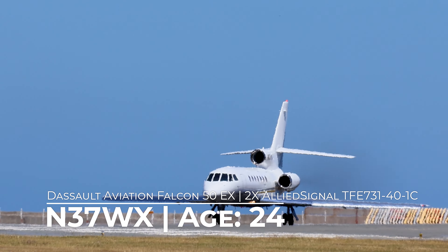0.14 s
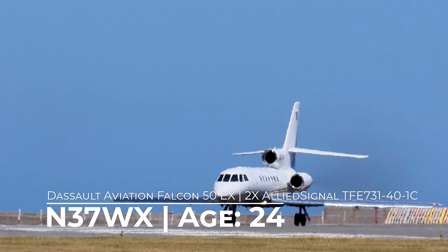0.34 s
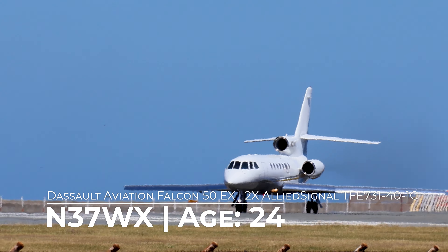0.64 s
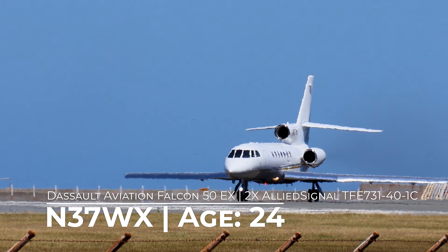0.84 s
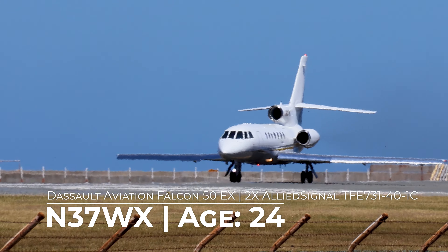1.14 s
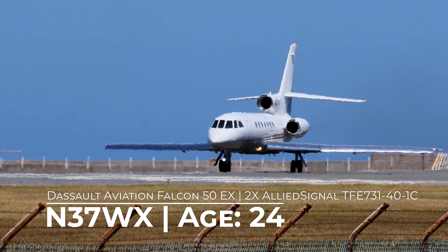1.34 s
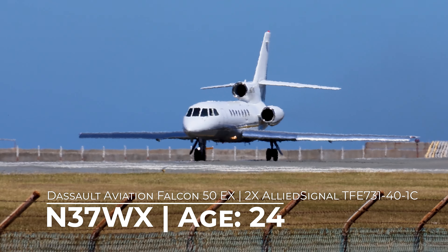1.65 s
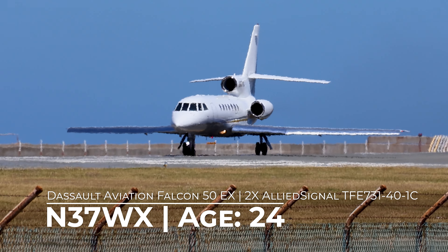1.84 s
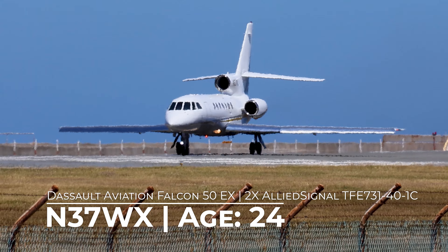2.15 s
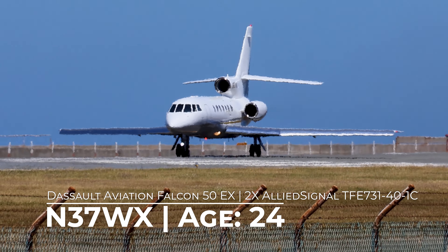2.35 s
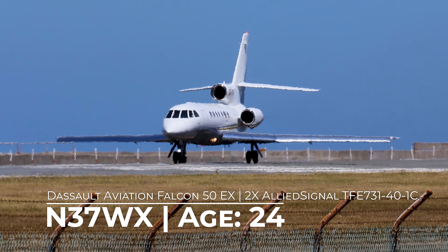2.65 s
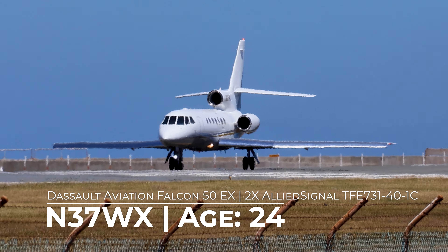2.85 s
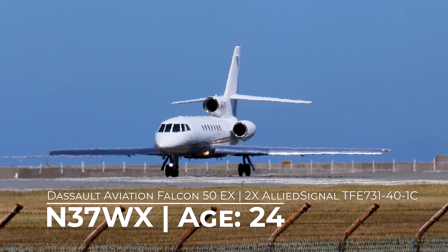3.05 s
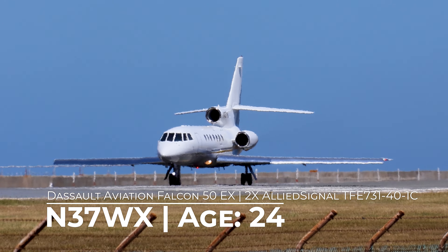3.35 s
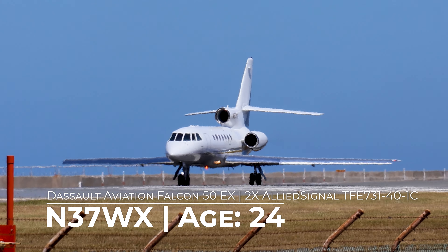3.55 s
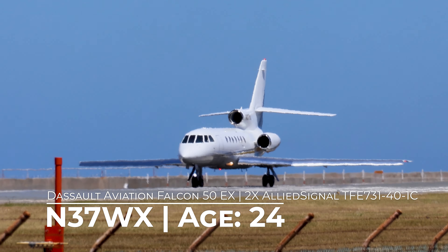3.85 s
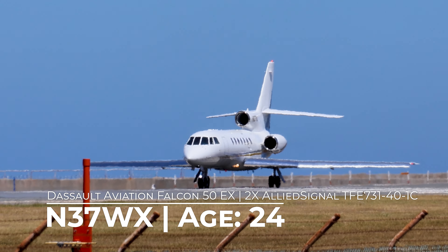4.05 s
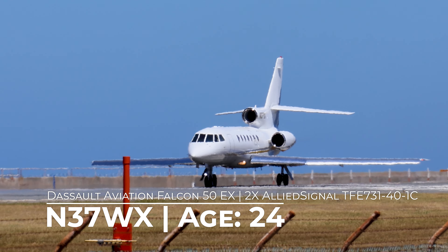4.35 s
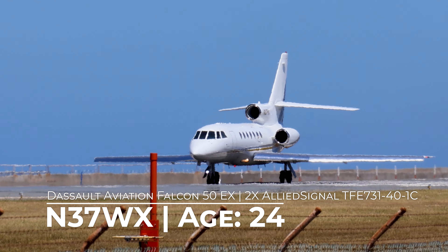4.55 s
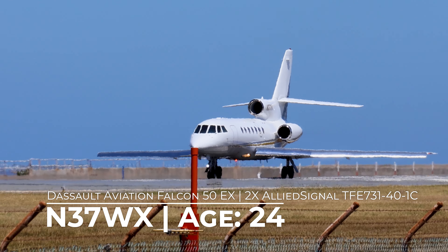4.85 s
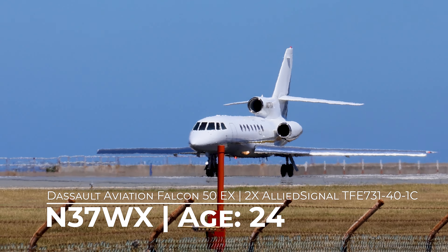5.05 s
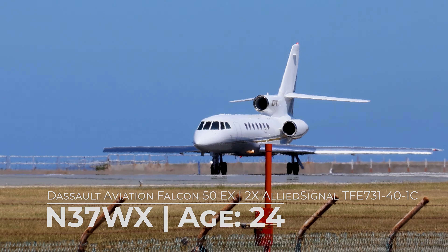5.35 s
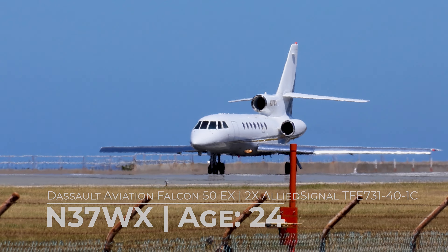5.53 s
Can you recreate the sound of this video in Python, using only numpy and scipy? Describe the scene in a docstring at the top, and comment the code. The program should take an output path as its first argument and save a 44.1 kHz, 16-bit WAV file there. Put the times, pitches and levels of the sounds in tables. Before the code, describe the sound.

A far-off jet starts its takeoff roll: faint hiss and whine swell into a broad roar, with a rough singing core tone appearing after two seconds. The fan pitch stops climbing near three seconds. Low wind buffets and dull knocks strike the open-air stereo microphone in clusters, densest after four seconds, with the engine ducking after strong hits.

```python
"""Business jet starting its takeoff roll

A three-engined jet spools up a few hundred metres away, slightly to the right of a two-port microphone.
Coloured noise makes the exhaust roar; gliding tones make the fan and core whines; all waver in moving air.
Close by, runs of damped thumps buffet the ports as gusts, with lone knocks, a faint rustle and ticks.
The recorder's limiter turns everything down after the strong gusts, and a low-pass cuts the top treble.
"""
import sys
import numpy as np
from scipy import signal
from scipy.fft import rfft, irfft, next_fast_len
from scipy.io import wavfile
from scipy.ndimage import uniform_filter1d

SR = 44100
rng = np.random.default_rng(int(sys.argv[2]) if len(sys.argv) > 2 else 0)


def wav_out(sig):
    """Save sig, one row per channel (or a flat mono array), as 16-bit PCM at SR to the path in sys.argv[1]."""
    wavfile.write(sys.argv[1], SR, np.round(np.clip(np.atleast_2d(sig).T, -1, 1) * 32767).astype(np.int16))


N = 250929
T = np.arange(N) / SR
PORT_SIGNS = np.array([[1], [-1]])  # left, right

# reference level of the distant jet, rising with thrust and drifting with the air: t/s, level/dB
JET_LEVEL = [(0, -49), (0.15, -43.5), (0.3, -43), (0.55, -37), (1.15, -34.5), (1.6, -33.5), (2.3, -31),
             (2.7, -29), (3.4, -29), (3.9, -31.5), (4.35, -31), (4.7, -36.5), (5.05, -36), (5.35, -33.5),
             (5.68, -31.5)]
# blade-passing pitch of the fan; the late creep is the jet gathering pace: t/s, f/Hz
FAN_PITCH = [(0, 2898), (0.35, 3085), (0.75, 3358), (1.25, 3752), (1.55, 4043), (2.2, 4734), (2.72, 5312),
             (3.4, 5445), (4.2, 5470), (5.69, 5570)]
# octave whines of the other two engines: pitch ratio, level/dB, fade/(dB/s), start/s
SISTER_WHINES = [(.927, -7.5, 5, -.1), (1.075, -13, 3, .15)]
# roar against the jet's level: t/s, level/dB
ROAR_SWELL = [(0, -0.5), (0.5, -1), (0.66, -1.5), (0.73, 0), (1.3, -0.5), (1.5, -1), (2.2, 0), (2.35, -1),
              (2.62, -3), (2.92, 2.5), (3.2, -1.5), (3.45, -0.5), (4.0, -0.5), (4.5, -1), (5.25, 0.5),
              (5.69, -1)]
# treble hiss against the jet's level: t/s, level/dB
HISS_SWELL = [(0, 0.5), (1.05, 0), (1.14, -5), (1.25, -1), (1.62, 0.5), (1.85, 1), (2.1, -0.5), (2.4, 1),
              (2.6, 1), (3.0, -0.5), (3.3, 0), (4.3, 0.5), (5.1, 0), (5.65, 1)]
# high-pressure spool, pitch of its fourth shaft order: t/s, f/Hz, level/dB
CORE_TONE = [(1.7, 2110, -52), (2.15, 2154, -41), (2.27, 2176, -29), (2.39, 2183, -29), (2.46, 2200, -38),
             (2.6, 2217, -34.5), (2.95, 2230, -33), (3.5, 2237, -38), (4.3, 2255, -45), (5.38, 2280, -45),
             (5.5, 2292, -34.5), (5.69, 2300, -36.5)]
# lines of the three spools and their gearing, the close pair beating: multiple of shaft speed, level/dB
CORE_LINES = [(3.25, -11), (3.994, -0.3), (4.013, -2.5), (4.26, -10), (5.06, -13), (12, -52)]
# how well the fan tones carry through the shifting air: t/s, blade tone level/dB, octave level/dB
TONE_CARRY = [(0, -7, -4), (0.2, -2, -1), (0.32, 0.5, -8), (0.42, -9, -12), (0.58, 1, -8), (0.68, -1.5, -5),
              (0.8, 1.5, -1), (0.92, -4, -4), (1.07, -1, -3), (1.16, -5, -3), (1.3, 1.5, 1), (1.43, -6, 0),
              (1.58, 1.5, 1), (1.75, -2, -8), (2.15, 3, -12), (2.4, 3.5, -16), (2.62, 4, -20),
              (2.8, -0.5, -20), (3.05, -5, -20), (3.45, 2.5, -20), (3.7, -3, -20)]

# noise colours, each scaled to rms 1 before its level is set: f/Hz, relative density/dB
# low end of the exhaust
RUMBLE_COLOUR = [(20, -44), (40, -33), (65, -12.5), (100, -6.5), (135, -0.5), (280, -2.5), (430, 3),
                 (600, 1), (800, -11.5), (1300, -35)]
# exhaust roar
ROAR_COLOUR = [(300, -28.5), (550, -17.5), (750, -5.5), (950, 0.5), (1150, 3), (1280, 2), (1400, -3),
               (1600, -3.5), (2100, -36.5)]
# core rush at low power
RUSH_SLOW_COLOUR = [(850, -41), (1450, -5.5), (1640, -2), (1890, 4), (2120, 1), (2330, -7.5), (2640, -5.5),
                    (2910, -21.5), (3100, -28), (4030, -44.5), (6820, -120)]
# core rush at takeoff power
RUSH_FAST_COLOUR = [(1200, -25), (1500, -10.5), (1750, -1.5), (1950, -0.5), (2120, 1.5), (2300, -3),
                    (2480, -8), (2720, -4.5), (2870, -9.5), (3080, -21.5), (3600, -37)]
# fan hiss at low power
HISS_SLOW_COLOUR = [(1760, -40), (3000, -8.5), (3140, -10), (3290, -3.5), (3930, -5), (4200, -4),
                    (5460, -19.5), (5930, -26.5), (7710, -40.5), (13000, -120)]
# fan hiss at takeoff power
HISS_FAST_COLOUR = [(2600, -18), (3050, 1.5), (3550, 2.5), (3950, -1), (4450, 4.5), (4750, 5.5),
                    (5150, -1.5), (5600, -9.5), (5900, -14.5), (6600, -24), (7700, -33), (11000, -61.5)]
# flutter of moving air at the ports
FLUTTER_COLOUR = [(20, -37.5), (50, -31.0), (90, -11.0), (140, -3.5), (260, -0.5), (450, -5.5),
                  (700, -14.5), (1400, -26.5), (3000, -58.5)]
# rustle of the breeze
RUSTLE_COLOUR = [(5500, -8.5), (7500, 3.5), (10000, -1.5), (14000, -3.5), (16000, -6.0)]
# dull crack at the front of a knock
CRACK_COLOUR = [(450, -4.0), (800, -2.0), (1400, -8), (3000, -25.5)]

# faint high rustle of the breeze: t/s, level/dB
RUSTLE_LEVEL = [(0, -80.5), (0.8, -70.5), (1.08, -70), (1.27, -65), (1.55, -71.5), (1.8, -68.5),
                (2.5, -73.5), (3.5, -70), (4.7, -76.5), (5.25, -75.5), (5.43, -70), (5.6, -72.5)]
# breeze at the ports between the gusts: t/s, level/dB
BREEZE_LEVEL = [(0, -56.5), (0.38, -55), (0.55, -46.5), (1.2, -40.5), (1.68, -46), (1.92, -39), (2.8, -50),
                (3.05, -36), (3.65, -37), (4, -46.5), (5.08, -50.5), (5.6, -36.5)]
# gusts on the microphone: centre t/s, length/s, level/dB, left minus right/dB, thump f/Hz
GUSTS = [(0.132, 0.019, -36.5, 3, 300), (0.204, 0.028, -31, 5, 316), (0.495, 0.011, -34.5, 8, 233),
         (0.787, 0.027, -24, 0.5, 240), (0.873, 0.016, -22.5, 4, 283), (0.905, 0.022, -26.5, 7, 307),
         (0.962, 0.027, -18.5, 2.5, 348), (0.995, 0.0093, -14.5, 5.5, 460), (1.495, 0.013, -31.5, 12, 300),
         (1.719, 0.013, -17, 3.5, 350), (1.739, 0.012, -10, 1, 350), (1.775, 0.033, -20, 8.5, 320),
         (2.041, 0.028, -20.5, 7, 337), (2.132, 0.02, -19, 6, 314), (2.203, 0.017, -25.5, 1, 301.3),
         (2.263, 0.015, -21, 2, 322), (2.339, 0.023, -21.5, 3, 330), (2.38, 0.015, -23, 8, 397),
         (2.423, 0.011, -11.5, 4, 476), (2.448, 0.029, -12.5, 1.5, 470), (2.554, 0.022, -26.5, 6.5, 370),
         (2.669, 0.023, -25.5, 7, 300), (2.87, 0.017, -31.5, 3, 300), (2.917, 0.016, -29, 10, 323),
         (3.342, 0.00973, -28, 9, 280), (3.735, 0.016, -12, 0.5, 294), (3.772, 0.019, -9.5, 7, 300),
         (3.819, 0.016, -20, 3, 270), (4.15, 0.019, -18.5, 9, 302), (4.193, 0.021, -10.5, 0.5, 423),
         (4.243, 0.034, -19, 9, 345), (4.423, 0.024, -9, 1, 395), (4.504, 0.017, -15, 4.5, 450),
         (4.57, 0.023, -24.5, 12, 460), (4.624, 0.0088, -27, 20, 427), (4.731, 0.021, -23.5, 1, 334),
         (4.76, 0.009, -12, 7, 448), (4.878, 0.018, -19.5, -3, 305), (4.94, 0.0271, -27.5, 2.5, 305),
         (5.003, 0.0089, -24, 19, 490), (5.212, 0.027, -15.5, 7, 367), (5.252, 0.029, -15.5, 1.5, 473),
         (5.332, 0.021, -25, 7, 350), (5.419, 0.018, -18, 10.5, 343), (5.462, 0.013, -22, 9, 370)]
# lone hard eddies knocking on the ports: t/s, level/dB, left minus right/dB, f/Hz
KNOCKS = [(0.237, -20.5, 12.5, 420), (0.859, -10.5, -3, 300), (0.996, -2, 9.5, 590),
          (1.008, -14.5, 8.5, 326), (1.03, -5, 9.5, 401), (1.047, -14.5, 6, 340), (1.069, -16.5, 2, 400),
          (1.719, -7, 7, 455), (1.73, -4, 7, 360), (1.738, 7, 0, 350), (2.419, -11, 1, 680),
          (2.424, -0.5, -2, 470), (2.479, -6, 6, 330), (2.544, -15.5, 5, 480), (3.705, -10, -5, 287),
          (3.726, -5, -5, 520), (3.734, -5.5, -5.5, 127), (3.819, -10, 6, 299.4), (4.139, -12.5, 13, 341),
          (4.23, -6.5, 15, 370), (4.41, -4.5, 4, 596), (4.504, -13.5, 9, 652), (4.517, -6.5, 18.5, 715),
          (4.712, -13.5, 0, 378), (4.769, -13.5, 1, 455), (4.889, -6.5, -7, 348), (5.242, -9, 2, 650),
          (5.29, -9.5, 6, 399), (5.377, -12, 17, 430), (5.48, -13, -13, 585), (5.484, -16, -3, 169)]
# faint ticks close by: peak t/s, centre f/Hz, level/dB, rise and fall time/s
TICKS = [(0.315, 6500, -57, 0.002), (3.312, 6860, -37, 0.0007), (3.42, 11400, -53, 0.004)]

# parts of the jet's noise against its level: (dB at low power, dB at takeoff power)
RUMBLE_DB, ROAR_DB, RUSH_DB, HISS_DB = (-8.5, -8), (-1, -1), (-0.5, -0.74), (-5, -9)
# the core rush swells once near full power: time of peak, time from peak to 1/e of the dB rise, rise
SURGE_S, SURGE_LENGTH_S, SURGE_DB = 1.96, 0.6, 3
# blade tone and octave against the jet's level before the air absorbs them; absorption
FAN_DB, OCTAVE_DB, AIR_DB_PER_KHZ2 = -2.3, 5.5, 0.62
# eddies in a gust: number per s, scatter of strength in dB, scatter of log pitch
EDDY_RATE, EDDY_SPREAD_DB, EDDY_PITCH_SPREAD = 480, 2.2, .3
# restless air around a gust: rise of power in gust lengths, fall time of power, level against the gust
STIR_RISE, STIR_FALL_S, STIR_DB = 1, 0.023, -12.5
BREEZE_SPREAD_DB = 2.5  # reach of the random swells
# decay of a knock in nepers per cycle; its crack's level and fall time
KNOCK_DAMPING, CRACK_DB, CRACK_S = 2.44, -15, .002
TOP_HZ = 15700  # treble cut-off


def undb(db):
    """Decibels to gain."""
    return 10 ** (np.asarray(db) / 20)


def curves(table):
    """Each column after the time as a control signal."""
    s, *columns = np.transpose(table)
    return [np.interp(T, s, column) for column in columns]


def unit(x):
    """Scale to rms 1."""
    return x / np.sqrt(np.mean(x ** 2))


def noise(colour):
    """Random noise shaped in frequency, rms 1."""
    hz, db = np.transpose(colour)
    f = np.maximum(np.arange(N // 2 + 1) * SR / N, 1)
    gain = undb(np.interp(np.log(f), np.log(hz), db, left=-120, right=-120))
    return unit(irfft(rfft(rng.standard_normal(N)) * gain, N))


def walk(rate):
    """Random levels held for 1 / rate s and slewed twice, rms 1."""
    k = max(int(SR / rate), 2)
    held = np.repeat(rng.standard_normal(N // k + 2), k)
    held = held[rng.integers(k):][:N]
    return unit(uniform_filter1d(uniform_filter1d(held, k), k))


def wide(colour, side_db):
    """Stereo noise: a common part, and a difference scattered by the ground."""
    return noise(colour) + undb(side_db) * noise(colour) * PORT_SIGNS


def drifting(colour, side_db, drift, drift_rate):
    """Stereo noise whose resonances slide a few percent as the path through the air changes."""
    place = np.cumsum(1 + drift * walk(drift_rate)) % N
    return np.array([np.interp(place, np.arange(N), port) for port in wide(colour, side_db)])


def shimmer(x, depth_db, fade_rate):
    """Warm air over the runway makes bands a third of an octave apart swell and fade on their own."""
    size = next_fast_len(N)
    spectrum = rfft(x, size)
    f = np.maximum(np.arange(size // 2 + 1) * SR / size, 1)
    # overlapping bands from 800 Hz; the lowest and highest take in all beyond them
    place = np.clip(3 * np.log2(f / 800), 0, 9)
    out = 0
    for k in range(10):
        band = irfft(spectrum * np.maximum(1 - np.abs(place - k), 0), size)[:, :N]
        out = out + band * undb(depth_db * walk(fade_rate))
    return out


def jet_noise():
    """Exhaust, core and fan noise; rush and hiss move upward as the engines gain speed."""
    jet_db, fan_hz = curves(JET_LEVEL)[0], curves(FAN_PITCH)[0]
    speed = ((fan_hz - fan_hz.min()) / np.ptp(fan_hz)) ** 2.6
    slow, fast = np.sqrt(1 - speed), np.sqrt(speed)
    rumble_db, roar_db, rush_db, hiss_db = (
        jet_db + low + (full - low) * speed for low, full in (RUMBLE_DB, ROAR_DB, RUSH_DB, HISS_DB))
    surge_db = SURGE_DB * np.exp(-((T - SURGE_S) / SURGE_LENGTH_S) ** 2)
    air_db = .5 * walk(21.99)  # turbulence along the path shakes roar, rush and hiss together

    rumble = wide(RUMBLE_COLOUR, side_db=-22.5) * undb(rumble_db + 1.0 * walk(8))

    roar = drifting(ROAR_COLOUR, side_db=-25.5, drift=.035, drift_rate=7)
    roar = roar * undb(roar_db + curves(ROAR_SWELL)[0] + air_db + 0.73 * walk(30))

    rush = slow * drifting(RUSH_SLOW_COLOUR, side_db=-20, drift=.02, drift_rate=9)
    rush = rush + fast * wide(RUSH_FAST_COLOUR, side_db=-15.5)
    rush = rush * undb(rush_db + surge_db + 0.49 * walk(40))

    hiss = slow * wide(HISS_SLOW_COLOUR, side_db=-11.0) + fast * wide(HISS_FAST_COLOUR, side_db=-8.5)
    hiss = hiss * undb(hiss_db + curves(HISS_SWELL)[0] + 0.32 * walk(30))
    return rumble + shimmer(roar + (rush + hiss) * undb(air_db), depth_db=1.5, fade_rate=20)


def whine(hz, scatter, flutter_hz, side_db):
    """A tone: the direct wave plus copies scattered by moving air, which make it fade and blur."""
    carrier = np.exp(2j * np.pi * np.cumsum(hz) / SR)
    mid = 1 + scatter * (walk(flutter_hz) + 1j * walk(flutter_hz))
    side = undb(side_db) * (walk(flutter_hz) + 1j * walk(flutter_hz))
    return unit(np.real(carrier * (mid + side * PORT_SIGNS)))


def absorbed(hz):
    """Loss in dB on the way through the air, growing with the square of the pitch."""
    return AIR_DB_PER_KHZ2 * (hz / 1000) ** 2


def fans():
    """The blade tone rises, wavering, and levels off; the other fans, a little lower, blur it."""
    hz = curves(FAN_PITCH)[0] * (1 + .004 * walk(16))
    db = curves(JET_LEVEL)[0] + FAN_DB + curves(TONE_CARRY)[0] - absorbed(hz)
    lead = whine(hz, scatter=.85, flutter_hz=110, side_db=-9) * undb(db + 2.5 * walk(24))
    others = whine(hz * .975, scatter=1.6, flutter_hz=189.3, side_db=-7) * undb(db - 3.5)
    return lead + others


def high_whines():
    """The three fans whine an octave up, side by side; the air absorbs more as their pitch climbs."""
    hz = 2 * curves(FAN_PITCH)[0]
    db = curves(JET_LEVEL)[0] + OCTAVE_DB - absorbed(hz)
    lead = whine(hz * (1 + .001 * walk(20)), scatter=.65, flutter_hz=80, side_db=-8)
    out = lead * undb(db + curves(TONE_CARRY)[1] + 2.5 * walk(28))
    for ratio, own_db, fade_db_per_s, start_s in SISTER_WHINES:
        sister_hz = hz * ratio * (1 + .002 * walk(20))
        tone = whine(sister_hz, scatter=1.1, flutter_hz=130, side_db=-2) * undb(2.5 * walk(24))
        entry = np.clip((T - start_s) / .2, 0, 1)
        out = out + tone * undb(db + own_db - fade_db_per_s * T) * entry
    return out


def rustle():
    """The breeze rustles faintly: high noise that swells and fades."""
    return wide(RUSTLE_COLOUR, side_db=4.5) * undb(curves(RUSTLE_LEVEL)[0])


def gust(length, hz, damping, skew_s):
    """A run of overlapping eddies, short damped thumps that hit the two ports unequally."""
    t = np.arange(int(.14 * SR)) / SR - .07  # centred on the gust
    count = 2 * min(round(1.2 * length * EDDY_RATE), 47) + 1
    draws = rng.standard_normal((96, 7))[:count]
    jitter, size, pitch, turn, skew, side, twist = draws.T[:, :, None]
    when = ((np.arange(count)[:, None] + .5 + .3 * jitter) / count - .5) * 2.4 * length
    force = 2 ** (-2.2 * (when / length) ** 2) * undb(EDDY_SPREAD_DB * size)
    thump_hz = hz * np.exp(EDDY_PITCH_SPREAD * pitch)
    ports = []
    for sign in (1, -1):
        cycles = thump_hz * np.maximum(t - when - sign * skew_s * skew + 0.0011, 0)
        swing = np.sin(2 * np.pi * (cycles + turn) + sign * 0.75 * twist)
        envelope = cycles * np.exp(-damping * cycles)
        ports.append(np.sum(force * undb(2 * sign * side) * envelope * swing, axis=0))
    # the ports pass neither the deepest pressure swings nor the treble
    band = signal.butter(3, [115, 1400], "bandpass", fs=SR, output="sos")
    ports = signal.sosfilt(band, ports)
    return ports / np.sqrt(np.sum(ports ** 2, axis=1, keepdims=True) / (length * SR))


def wind():
    """Gusts thump on the ports over a soft, uneven flutter that swells with them."""
    pad = SR // 2  # room for gusts that overlap either end
    thumps, stir_power = np.zeros((2, N + SR)), np.zeros(N)
    breeze = undb(curves(BREEZE_LEVEL)[0] + BREEZE_SPREAD_DB * np.tanh(walk(40)))
    flutter = wide(FLUTTER_COLOUR, side_db=-10.0)
    for s, length, db, pan_db, hz in GUSTS:
        burst = gust(length, hz, damping=2.19, skew_s=0.00046)
        start = int(s * SR) + pad - burst.shape[1] // 2
        thumps[:, start:start + burst.shape[1]] += burst * undb(db + PORT_SIGNS * pan_db / 2)
        # the air stays restless around each gust
        distance = np.maximum((s - T) / (STIR_RISE * length), (T - s) / STIR_FALL_S)
        stir_power += undb(db + STIR_DB) ** 2 * np.exp(-distance)
    return thumps[:, pad:][:, :N] + flutter * (breeze + np.sqrt(stir_power))


def knocks():
    """A lone eddy slaps both ports with a damped swing of pressure and a dull crack at its front."""
    out = np.zeros((2, N + SR))
    t = np.arange(int(.03 * SR)) / SR
    crack = wide(CRACK_COLOUR, side_db=-2.5)
    ports = signal.butter(2, [110, 1500], "bandpass", fs=SR, output="sos")
    draws = rng.standard_normal((len(KNOCKS), 2))
    for (s, db, pan_db, hz), (turn, twist) in zip(KNOCKS, draws):
        i = int(s * SR)
        age = KNOCK_DAMPING * hz * t
        phase = 2 * np.pi * (hz * t + turn) + PORT_SIGNS * 0.95 * np.tanh(twist)
        swing = age * np.exp(1 - age) * np.sin(phase)
        front = undb(CRACK_DB) * crack[:, i:i + len(t)] * np.exp(-t / CRACK_S)
        slap = signal.sosfilt(ports, swing + front)
        out[:, i:i + len(t)] += slap * undb(db + PORT_SIGNS * pan_db / 2)
    return signal.sosfilt(signal.butter(4, 2800, fs=SR, output="sos"), out[:, :N])


def ticks():
    """Something ticks near the microphone: tiny bursts of noise around one pitch."""
    out = np.zeros((2, N))
    for s, hz, db, fall_s in TICKS:
        colour = [(hz / 2, -22), (hz * 0.7, -2), (hz, 0), (hz * 1.1, -4), (hz * 1.6, -28)]
        out += wide(colour, side_db=-2.5) * undb(db) * np.exp(-np.abs(T - s) / fall_s)
    return out


def core():
    """Near full power the high-pressure spools sing and beat, their tones broken up by the hot air."""
    hz, db = curves(CORE_TONE)
    shaft_hz = hz / 4 * (1 + .0012 * walk(40))
    lines = 0
    for multiple, line_db in CORE_LINES:
        line = whine(shaft_hz * multiple, scatter=1.3, flutter_hz=85, side_db=-12)
        lines = lines + line * undb(line_db)
    return lines * undb(db + 1.0 * walk(30)) * np.interp(T, [1.6, 1.8], [0, 1])


def arrive(x, lag_s):
    """The jet is slightly to the right, so it reaches the left port a moment later."""
    late = np.exp(-2j * np.pi * lag_s * np.arange(N // 2 + 1) * SR / N)
    return np.array([irfft(rfft(x[0]) * late, N), x[1]])


def scene():
    """The jet far off, the wind close by."""
    jet = jet_noise() + fans() + high_whines() + core()
    return arrive(jet, lag_s=.00001) + rustle() + wind() + knocks() + ticks()


def limiter(x, ceiling_db, quick_release_db, slow_release_db, slow_share):
    """Turns both channels down when either is too loud; the gain recovers fast, then slowly (dB/s)."""
    power = uniform_filter1d(x ** 2, int(0.0052 * SR)).max(axis=0)
    excess = np.maximum(10 * np.log10(np.maximum(power, 1e-12)) - ceiling_db, 0)
    quick = np.maximum.accumulate(excess + quick_release_db * T) - quick_release_db * T
    slow = np.maximum.accumulate(slow_share * excess + slow_release_db * T) - slow_release_db * T
    return x * undb(-np.maximum(quick, slow))


def record(dry):
    """The recorder's limiter, then a steep treble cut-off."""
    held = limiter(dry, ceiling_db=-9.5, quick_release_db=48.5, slow_release_db=10, slow_share=0.6)
    return signal.sosfilt(signal.ellip(8, .2, 70, TOP_HZ, fs=SR, output="sos"), held)


dry = scene()
out = record(dry)
wav_out(out)
```